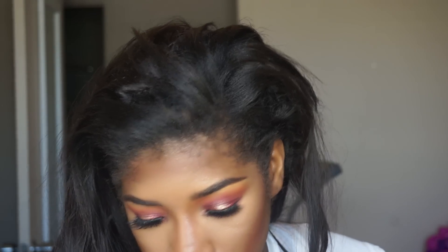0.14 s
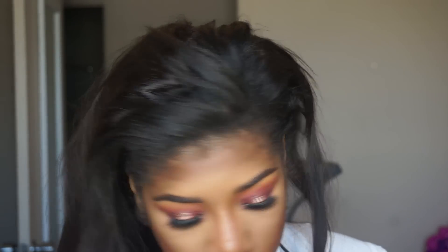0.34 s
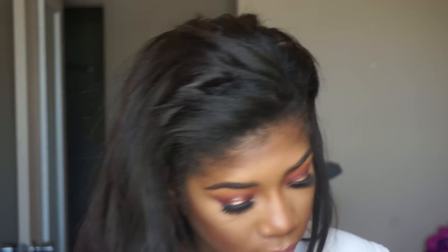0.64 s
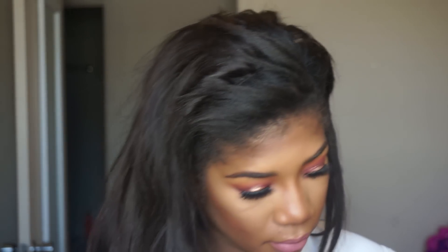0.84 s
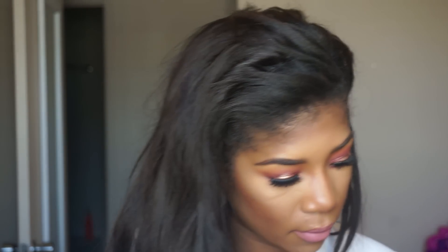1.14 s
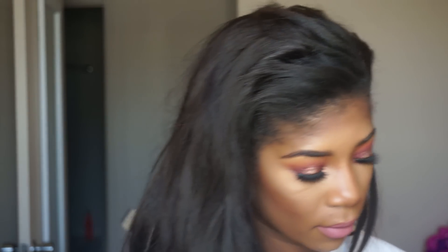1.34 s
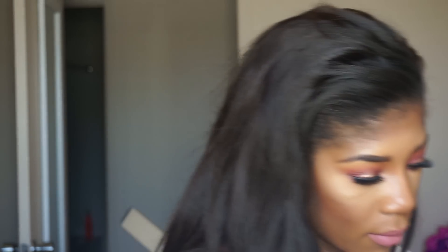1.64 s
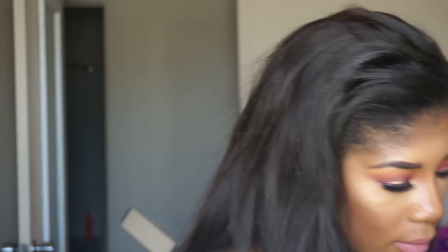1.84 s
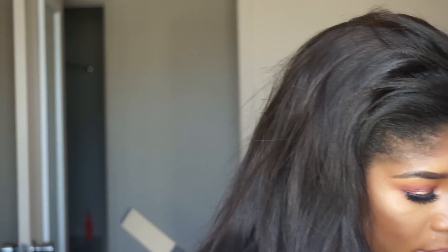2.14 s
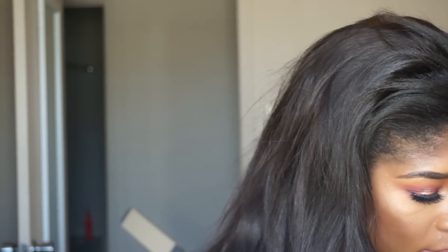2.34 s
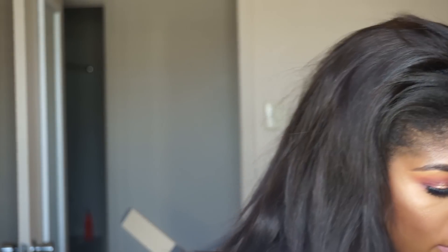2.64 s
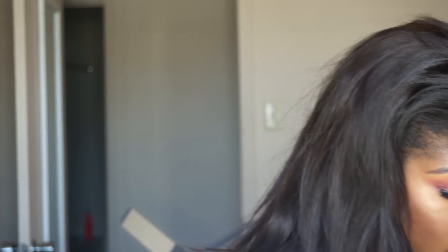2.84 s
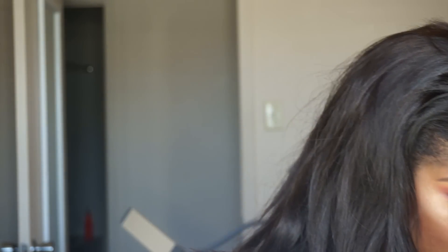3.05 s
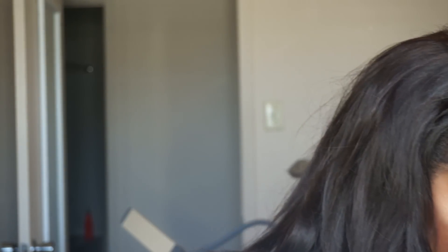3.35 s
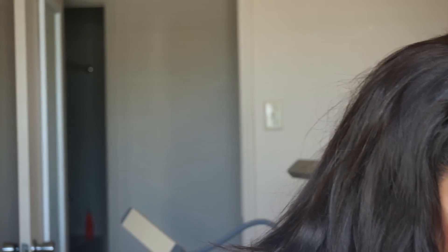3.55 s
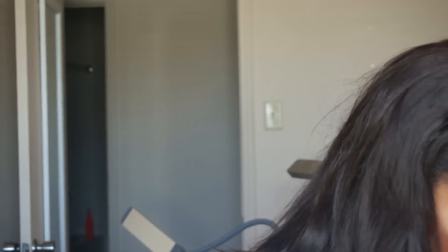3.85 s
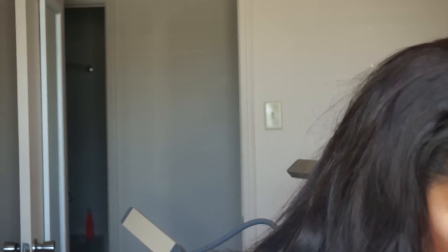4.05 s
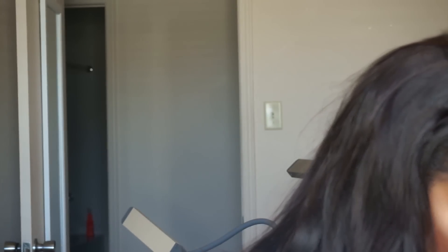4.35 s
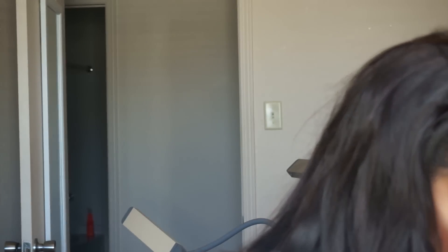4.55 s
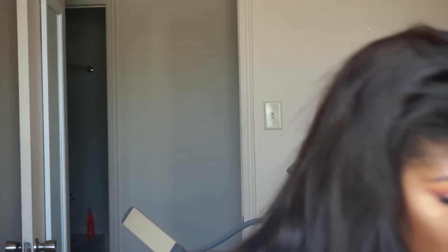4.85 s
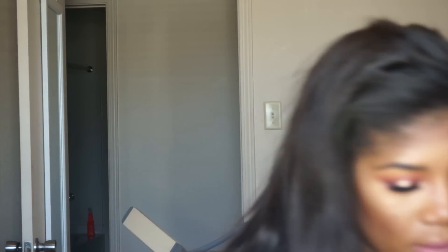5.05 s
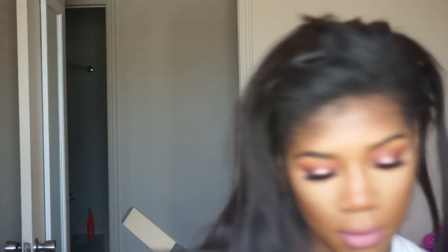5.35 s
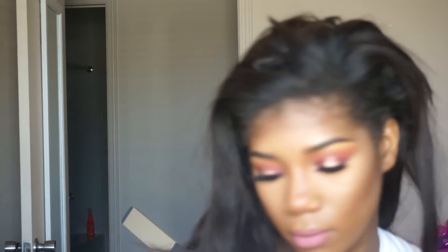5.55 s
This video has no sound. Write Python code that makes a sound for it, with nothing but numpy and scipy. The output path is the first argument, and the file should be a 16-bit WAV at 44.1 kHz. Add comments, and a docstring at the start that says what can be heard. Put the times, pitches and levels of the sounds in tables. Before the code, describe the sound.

A hard jar is knocked down and rings briefly, light taps follow, then plastic makeup cases clatter noisily as a hand rummages through a box.

```python
"""A hand rummages through a box of plastic makeup cases, which clack together and land in the box.
Before that a hard jar is knocked down and rings, and light taps and rubbing fingers follow.
Blows are crackling noise forces that drive decaying modes; sliding is a stream of tiny contacts.
All is heard by two close microphones in a small, lively room, over a faint hum and hiss of shaped noise."""
import sys
import numpy as np
from scipy import signal
from scipy.fft import rfft, irfft, next_fast_len
from scipy.io import wavfile

SR = 44100
rng = np.random.default_rng(int(sys.argv[2]) if len(sys.argv) > 2 else 0)


def generate_wav(sig):
    """Save sig (samples, or channels by samples) to the path in sys.argv[1] as 16-bit PCM at SR."""
    pcm = np.round(np.clip(np.atleast_2d(sig).T, -1, 1) * 32767).astype(np.int16)
    wavfile.write(sys.argv[1], SR, pcm)


N = 251811   # length [samples]
BLOW_T = np.arange(int(.6 * SR)) / SR   # time within one blow or room response [s]
# low, middle and high band of a blow, split at 700 and 2500 Hz
BAND_EDGES = [(700, "low"), ([700, 2500], "band"), (2500, "high")]
BANDS = [signal.butter(3, edge, kind, fs=SR, output="sos") for edge, kind in BAND_EDGES]


def clatter(paths, brief_ring_db):
    """Each case clacks against its neighbours and a moment later lands in the box with a deeper knock."""
    # clacks and landings: (time [s], middle-band level [dB], treble re middle band [dB],
    # rattle decay constant [s], ring [Hz], drop time [s], middle-band level of the landing [dB])
    case_hits = [(2.766, -42.5, -12, 0.014, 1490, 0.017, -40), (2.799, -26.5, -6, 0.029, 1460, .024, -27),
                 (2.879, -19, -4, 0.0054, 1420, 0.042, -44), (3.035, -35.5, -16, 0.017, 1230, .012, -36),
                 (3.083, -34, -5, 0.0038, 3240, .02, -50), (3.195, -43, -1.5, 0.014, 3350, 0.026, -50.5),
                 (3.288, -22.5, -25, .001, 1250, 0.0083, -34.5),
                 (3.295, -21, -7.5, 0.0043, 1240, .005, -32), (3.361, -29, -14, 0.0046, 1420, .01, -54),
                 (3.370, -17, -7.5, 0.0044, 1386, 0.044, -31), (3.561, -32.5, -16, 0.011, 1230, .01, -35),
                 (3.726, -28, -16, 0.0014, 1430, .012, -28), (3.736, -19.5, -9, 0.012, 1360, 0.017, -39),
                 (3.814, -19, -6, 0.0067, 1000, 0.021, -26),
                 (3.927, -29.5, -32, 0.0033, 670, 0.0031, -34.5),
                 (3.975, -32.5, -21, 0.0059, 1410, 0.019, -42),
                 (4.015, -19.5, -6.5, 0.0074, 1120, 0.033, -26), (4.131, -25, -5, 0.0065, 3200, 0.037, -28),
                 (4.239, -28, -1, 0.0095, 1470, 0.0097, -24.5), (4.454, -38, -7.5, 0.0074, 1410, .008, -40),
                 (4.603, -40.5, -10, .004, 1370, .008, -41), (4.612, -23, -6.5, 0.0062, 1400, .011, -22.5),
                 (4.681, -18.5, -7, 0.013, 1350, .018, -22.5), (4.767, -28, -13, .017, 950, 0.018, -54),
                 (4.869, -34, -8.5, 0.012, 850, .015, -41.5), (4.963, -36.5, -18, 0.0067, 830, 0.017, -48),
                 (5.037, -28, -5, 0.0092, 954, 0.012, -32), (5.208, -49, 7.5, 0.014, 1540, .012, -55),
                 (5.221, -33, -12, .002, 1400, .01, -44), (5.250, -26.5, 3, 0.0031, 900, .016, -31.5),
                 (5.324, -34, -8, 0.0061, 870, 0.0097, -38), (5.481, -35.5, -9, 0.013, 1570, 0.041, -37.5),
                 (5.621, -43.5, -4, 0.0044, 830, 0.0088, -53), (5.695, -43.5, 4, .014, 775, 0.0094, -53)]
    clack_bass_db = -11   # re the middle band: case against case has little bass
    landing_rattle_s, landing_ring_db = 0.0079, -8.5
    landing_bass_db, landing_treble_db = -0.5, -7   # re the middle band
    out = np.zeros((2, N))
    for s, db, treble_db, rattle_s, hz, drop_s, landing_db in case_hits:
        clack = case_blow(rattle_s, hz, ringing(brief_ring_db, rattle_s), box_db=-13.5)
        add(out, s, clack, paths, [db + clack_bass_db, db, db + treble_db])
        landing = case_blow(landing_rattle_s, hz, landing_ring_db, box_db=-10.5)
        landing_bands = [landing_db + landing_bass_db, landing_db, landing_db + landing_treble_db]
        add(out, s + drop_s, landing, paths, landing_bands)
    return out


def case_blow(rattle_s, hz, ring_db, box_db):
    """A case rattles against what it meets, rings briefly at its own pitch and shakes the box."""
    # what the box rings with: (frequency [Hz], level re the other modes [dB], t60 [s])
    box_modes = [(287, -12.5, 0.15), (323, -32, 0.1), (423.7, -8.5, 0.15), (523, -29, 0.097),
                 (613.3, -3, 0.13), (828, 0, 0.65), (973.5, -6.5, 0.05), (1080, -36, 0.067),
                 (1230, -24, 0.074), (1300, -27, 0.12), (1490, -28, 0.27), (1665, -32, .15),
                 (2240, -6, 0.11), (3230, 2, 0.082), (4400, 5, 0.013)]
    force = rattle(rattle_s, gap_s=.0035, touch_s=0.00092, uneven_db=4.5)
    case = from_db(ring_db) * rung(force, [(hz, 0, .009)], scatter_db=0)
    box = from_db(box_db) * rung(force, box_modes, scatter_db=0.5)
    return force + case + box


def box_paths():
    """Two paths from the box to the microphones, coloured by the box."""
    # box colour: (frequency [Hz], gain [dB])
    box_colour = [(30, -40), (70, -40.5), (130, -26), (225, -28), (290, -4.5), (430, -2.5), (900, 4),
                  (1450, 7), (2000, -1.5), (3400, -7.5), (5500, -12.5), (9500, -14), (11000, -20.5)]
    return [room(box_colour, direct_db=-4.0, echo_db=-18.5, echo_s=.0055) for spot in range(2)]


def shuffle(path):
    """Sweeps of the hand slide and jostle the cases: sparse, uneven contacts heard through the box."""
    # sweeps: (time of full level [s], hold [s], level [dB])
    sweeps = [(2.80, 0.16, -34.5), (3.26, 0.21, -40), (3.81, 0.57, -49.5), (4.66, 0.036, -26.5),
              (5.42, .29, -46.5)]
    return friction(strokes(sweeps, attack_s=0.062, release_db_per_s=59), path, per_s=430, uneven_db=4)


def drag():
    """The box judders over the table: an abrupt stream of contacts in a narrow low colour."""
    # pulls: (time of full level [s], hold [s], level [dB])
    pulls = [(2.81, 0.087, -36.5)]
    # colour of box on table: (frequency [Hz], gain [dB])
    drag_colour = [(40, -33), (130, -21), (225, -52), (280, 7), (305, 11), (380, -24), (1000, -45),
                   (11000, -53)]
    level = strokes(pulls, attack_s=0.018, release_db_per_s=278)
    path = room(drag_colour, direct_db=1.0, echo_db=5, echo_s=0.00615)
    return friction(level, path, per_s=680, uneven_db=4.0)


def jar(ring_db):
    """A hard hollow jar meets the table, rocks and rings; a softer contact is duller."""
    # knocks: (time [s], middle-band level [dB], bass and treble re middle band [dB, dB],
    # rattle decay constant [s], contact cut-off [Hz])
    knocks = [(0.040, -23.5, 0, -7.5, 0.0024, 5400), (0.075, -36, -9, -4, 0.0068, 3560),
              (0.110, -31, -13, -2, 0.0016, 7900), (0.116, -28, -9.5, -1.5, 0.00087, 7500),
              (0.299, -31.5, -14, -1, 0.0012, 3930)]
    # what the jar rings with: (frequency [Hz], level re the other modes [dB], t60 [s])
    jar_modes = [(284, -17, 0.23), (581, -3, 0.041), (645, -1.5, 0.052), (1165, -10, 0.059),
                 (1467, -11, 0.071), (1610, -3.5, 0.026), (2140, -19, 0.023), (2520, -14, 0.021),
                 (2970, -0.5, 0.026), (3040, -4.5, 0.44), (3435, -6.5, 0.11), (4797, 5, 0.015),
                 (4856, -1.5, 0.029), (8530, 4, 0.046), (8770, -12, 0.061), (9500, 1, 0.049)]
    # jar colour: (frequency [Hz], gain [dB])
    jar_colour = [(40, -48), (130, -24.5), (285, -1), (400, -6), (620, 5), (850, 3), (1500, 11), (2900, 6),
                  (5000, -3.5), (6000, -3.5), (11000, -4)]
    out = np.zeros((2, N))
    paths = [room(jar_colour, direct_db=-3.5, echo_db=-26, echo_s=0.0071) for spot in range(2)]
    for s, db, bass_db, treble_db, rattle_s, cut_hz in knocks:
        force = rattle(rattle_s, gap_s=0.0015, touch_s=0.00072, uneven_db=5)
        struck = force + from_db(ring_db) * rung(force, jar_modes, scatter_db=2.5)
        softness = signal.butter(2, cut_hz, fs=SR, output="sos")
        add(out, s, signal.sosfilt(softness, struck), paths, [db + bass_db, db, db + treble_db])
    return out


def taps(brief_ring_db, cycles):
    """Small things held in the hand: damped, each ring losing 60 dB within a few cycles."""
    # taps: (time [s], middle-band level [dB], treble re middle band [dB],
    # rattle decay constant [s], ring [Hz])
    light_taps = [(0.669, -63.5, -5, 0.0023, 433), (1.074, -54.5, -13, 0.0062, 1100),
                  (1.134, -47, -9.5, 0.0008, 500), (1.232, -43, -12, 0.0036, 1120),
                  (1.369, -60.5, -22, .004, 440), (1.462, -43.5, 3.5, 0.0036, 1900),
                  (1.579, -40, -16, 0.0086, 620), (1.617, -48.5, -17, 0.0046, 475),
                  (1.699, -41, -19, 0.0051, 690), (1.752, -50.5, -6, 0.0034, 368),
                  (1.819, -46.5, -1, 0.0045, 420), (2.119, -54, -30, 0.002, 640),
                  (2.3, -55, 0.5, 0.0025, 3820), (2.353, -56, -3, .005, 1830)]
    # tap colour: (frequency [Hz], gain [dB])
    tap_colour = [(40, -45), (130, -15), (200, 2.5), (300, 13.5), (600, 4.5), (1500, 3.5), (3000, 1),
                  (6000, -4.5), (11000, -10)]
    full_bass_hz, bass_db_per_octave = 450, -8   # smaller things ring higher and have less bass
    out = np.zeros((2, N))
    paths = [room(tap_colour, direct_db=-6.0, echo_db=-15, echo_s=.006) for spot in range(2)]
    for s, db, treble_db, rattle_s, hz in light_taps:
        force = rattle(rattle_s, gap_s=0.0018, touch_s=0.0018, uneven_db=6.0)
        ring_db = ringing(brief_ring_db, rattle_s)
        ring = from_db(ring_db) * rung(force, [(hz, 0, cycles / hz)], scatter_db=0)
        bass_db = bass_db_per_octave * np.log2(hz / full_bass_hz)
        add(out, s, force + ring, paths, [db + bass_db, db, db + treble_db])
    return out


def rub():
    """Fingers rub over a case: dense, fairly even contacts."""
    # rubs: (time of full level [s], hold [s], level [dB])
    rubs = [(0.0, .25, -50.5), (0.35, 0.25, -68), (1.58, 0.028, -51), (1.72, .05, -51), (1.795, .01, -37),
            (1.88, 0.59, -62)]
    # colour of fingers on a case: (frequency [Hz], gain [dB])
    rub_colour = [(40, -25), (130, -1), (300, 1), (800, 10), (2000, -11), (3500, 2), (5200, 1), (7000, -2),
                  (11000, -11)]
    level = strokes(rubs, attack_s=0.063, release_db_per_s=334)
    path = room(rub_colour, direct_db=-10.5, echo_db=-9, echo_s=0.02)
    return friction(level, path, per_s=1300, uneven_db=1.0)


def rattle(rattle_s, gap_s, touch_s, uneven_db):
    """Contact force: touches follow at uneven gaps, swell as the parts seat, then die; each crackles."""
    when = np.cumsum(rng.uniform(.3, 1.7, 60) * gap_s)
    when -= when[0]
    age = when / max(rattle_s, 1e-3)
    size = (0.84 + 1.07 * age) * np.exp(-age)
    size = size * from_db(uneven_db * rng.standard_normal(len(when)))
    touches = np.bincount((when * SR).astype(int), size ** 2, len(BLOW_T))[:len(BLOW_T)]
    # the power of each touch decays with time constant touch_s
    power = signal.lfilter([1], [1, -np.exp(-1 / (touch_s * SR))], touches + 1e-18)
    return unit_energy(np.sqrt(power) * rng.standard_normal(len(BLOW_T)))


def resonate(x, hz, r):
    """Two-pole resonator at hz; the pole radius r sets how long it rings."""
    return signal.lfilter([1, 0, -1], [1, -2 * r * np.cos(2 * np.pi * hz / SR), r * r], x)


def rung(force, modes, scatter_db):
    """Modes driven by a force; each blow lands elsewhere and finds them with new strengths."""
    gains = from_db(scatter_db * rng.standard_normal(len(modes))) * rng.choice([-1, 1], len(modes))
    out = 0
    for gain, (hz, db, t60) in zip(gains, modes):
        r = np.exp(-np.log(1000) / (t60 * SR))
        out = out + gain * from_db(db) * unit_energy(resonate(force, hz, r))
    return unit_energy(out)


def ringing(brief_db, rattle_s):
    """Ring level [dB]: a brief touch lets a thing ring clearly; a long rattle masks the ring."""
    brief_rattle_s, db_per_doubling = 0.0011, -3.5
    return brief_db + db_per_doubling * np.log2(max(rattle_s, 1e-3) / brief_rattle_s)


def strokes(rows, attack_s, release_db_per_s):
    """Level of hand movements: each swells, holds and dies away."""
    t, power = np.arange(N) / SR, 0
    for s, hold_s, db in rows:
        swell = np.clip(1 + (t - s) / attack_s, 0, 1) ** 2
        release_db = release_db_per_s * np.maximum(t - s - hold_s, 0)
        power = power + (swell * from_db(db - release_db)) ** 2
    return np.sqrt(power)


def friction(level, path, per_s, uneven_db):
    """Sliding surfaces catch and slip: a stream of tiny contacts of uneven size."""
    sizes = from_db(uneven_db * np.minimum(rng.exponential(1, N), 4)) * rng.choice([-1, 1], N)
    slips = level * rms_one(sizes * (rng.random(N) < per_s / SR))
    return signal.fftconvolve(slips[None], np.sqrt(2) * unit_energy(path))[:, :N]


def add(out, s, struck, paths, band_db):
    """One blow sounds into the room; its weight and hardness set three band levels."""
    # the thing shifts as it settles, from one path through the room to another
    shift = np.pi / 2 * (1 - fade(0.058))
    shares = [np.cos(shift), np.sin(shift)]
    heard = sum(signal.fftconvolve((struck * share)[None], path) for share, path in zip(shares, paths))
    start = int(s * SR)
    for sos, db in zip(BANDS, band_db):
        band = signal.sosfilt(sos, heard[:, :len(BLOW_T)])
        level = np.sqrt(np.mean(band[:, :int(.04 * SR)] ** 2))   # rms of the first 40 ms
        out[:, start:start + len(BLOW_T)] += (from_db(db) / level * band)[:, :N - start]


def room(spectrum, direct_db, echo_db, echo_s):
    """Path to the microphones: direct sound, a bounce off the table, a diffuse tail that dies by octave."""
    # reverberation time: (frequency [Hz], t60 [s])
    reverb_times = [(100, 0.9), (300, 0.45), (1000, 0.38), (3000, 0.33), (6000, 0.36), (11000, 0.27)]
    white, tail = rng.standard_normal((2, len(BLOW_T))), 0
    hz = np.arange(len(BLOW_T) // 2 + 1) * SR / len(BLOW_T)
    centres = 100 * 2. ** np.arange(8)   # octave centres [Hz]
    for centre, share in zip(centres, np.eye(len(centres))):
        band = irfft(rfft(white) * np.interp(hz, centres, share), len(BLOW_T))
        tail = tail + band * fade(at_hz(reverb_times, centre))
    # the diffuse sound takes a moment to build up
    mid, side = [unit_energy(part * (1 - fade(0.0017))) for part in tail]
    mid[0] += from_db(direct_db)
    mid[int(echo_s * SR)] += from_db(echo_db)
    return colour(stereo(mid, from_db(-1.5) * side), spectrum)


def standing_waves(x):
    """The room's low modes swell with each knock and boom on."""
    # low room modes: (frequency [Hz], width [Hz], peak gain [dB])
    room_modes = [(134.7, 4.4, 15.5), (288, 16, -15), (428.2, 19.7, -0.5)]
    out = 0
    for hz, width_hz, db in room_modes:
        r = np.exp(-np.pi * width_hz / SR)
        out = out + from_db(db) * (1 - r * r) / 2 * resonate(x, hz, r)
    return out


def stereo(mid, side):
    """Two close microphones differ a little, least around 300 Hz."""
    # gain of the side signal: (frequency [Hz], gain [dB])
    spread = [(100, -13), (300, -17.5), (600, -10.5), (1500, -7), (5000, -6), (11000, -10)]
    return mid + colour(side, spread) * [[1], [-1]]


def room_tone(level_db):
    """Faint hum and hiss of the room: noise shaped by a spectrum, fullest in the low mids."""
    # shape of the noise: (frequency [Hz], relative density [dB])
    tone_colour = [(18, -86), (30, -70), (114, -19.5), (239, -10), (329, 1), (364, -4.5), (726, -5),
                   (1220, -10.5), (2150, -11), (4300, -16), (11000, -17), (14300, -50), (22000, -120)]
    noise = stereo(*rng.standard_normal((2, N)))
    return from_db(level_db) * rms_one(colour(noise, tone_colour))


def from_db(db):
    """Decibels to gain."""
    return 10 ** (np.asarray(db) / 20)


def rms_one(x):
    """Scale to an rms of one."""
    return x / np.sqrt(np.mean(x ** 2) + 1e-20)


def unit_energy(x):
    """Scale to an energy of one."""
    return x / np.sqrt(np.sum(x ** 2) + 1e-20)


def at_hz(points, hz):
    """Read a table on a log-frequency axis."""
    known_hz, value = np.transpose(points)
    return np.interp(np.log(np.maximum(hz, 1)), np.log(known_hz), value)


def fade(t60):
    """A decay that loses 60 dB in t60 seconds."""
    return from_db(-60 * BLOW_T / t60)


def colour(x, spectrum):
    """Causal (minimum-phase) filter with the given spectrum, made by folding its cepstrum."""
    size = 2 * next_fast_len(x.shape[-1])
    hz = np.arange(size // 2 + 1) * SR / size
    cepstrum = irfft(np.log(from_db(at_hz(spectrum, hz))))
    cepstrum[1:size // 2] *= 2
    cepstrum[size // 2 + 1:] = 0
    return irfft(rfft(x, size) * np.exp(rfft(cepstrum)))[..., :x.shape[-1]]


def scene():
    """The handling, a little to the right, over the hum and hiss of the room."""
    from_box = box_paths()
    things = jar(ring_db=1.5) + taps(brief_ring_db=-3, cycles=10.2)
    things += clatter(from_box, brief_ring_db=2.0)
    things += shuffle(from_box[0]) + drag() + rub()
    to_the_right = from_db([[-.35], [.35]])
    return (things + standing_waves(things)) * to_the_right + room_tone(level_db=-59)


def record(dry):
    """The loudest peaks are rounded at the microphone, the top is cut steeply."""
    loudest, cutoff_hz = 1, 11150
    rounded = loudest * np.tanh(dry / loudest)
    return signal.sosfilt(signal.ellip(12, .1, 75, cutoff_hz, fs=SR, output="sos"), rounded)


dry = scene()
out = record(dry)
generate_wav(out)
```